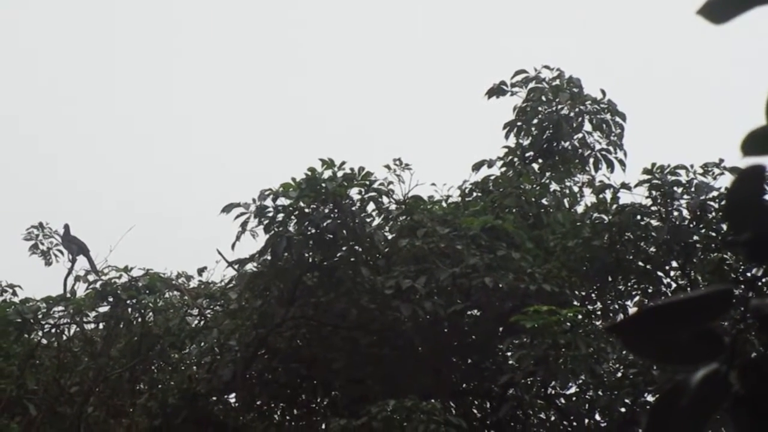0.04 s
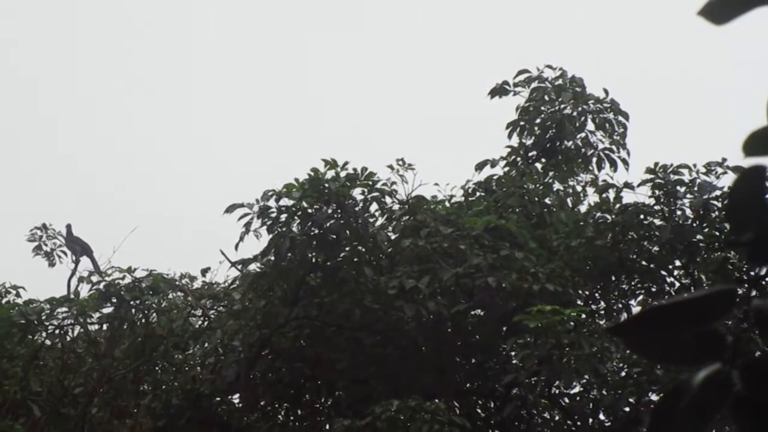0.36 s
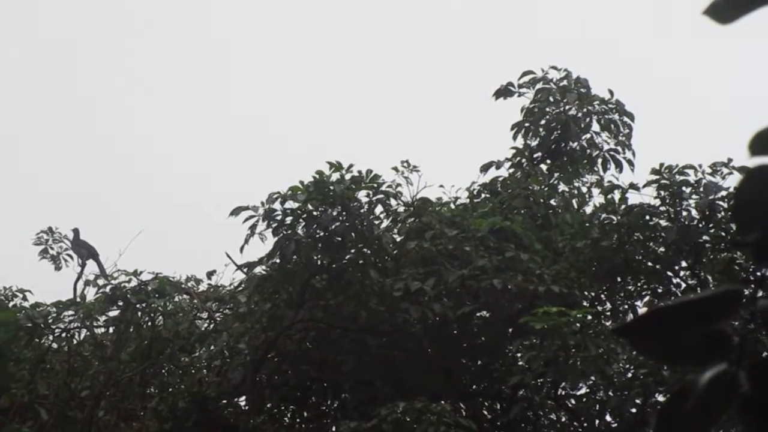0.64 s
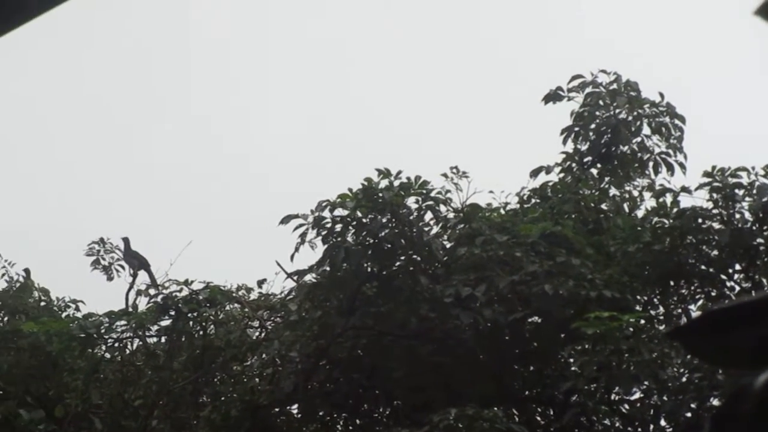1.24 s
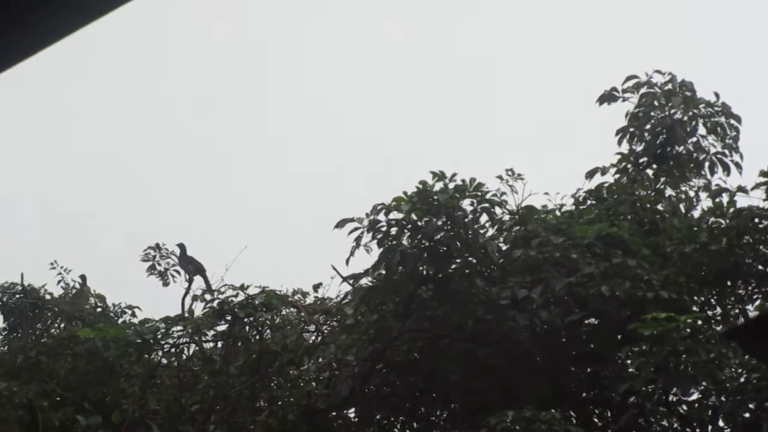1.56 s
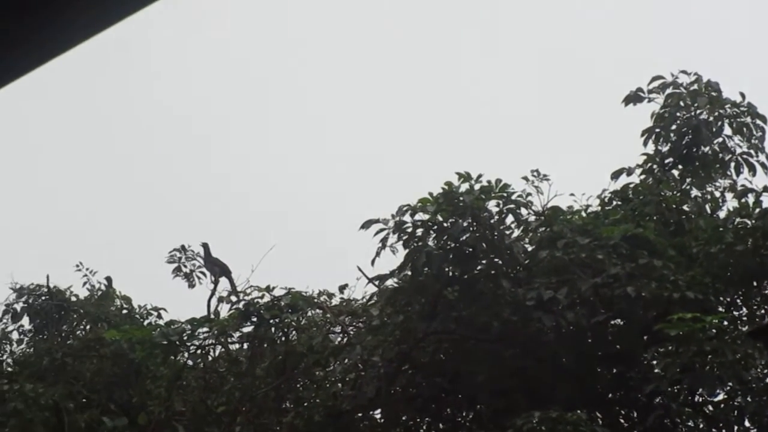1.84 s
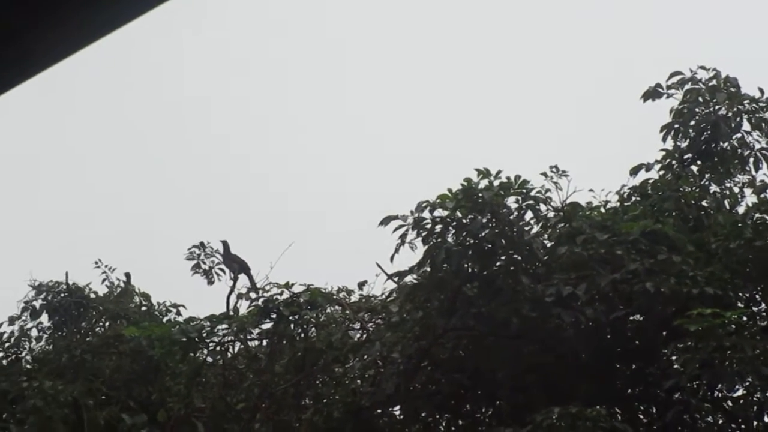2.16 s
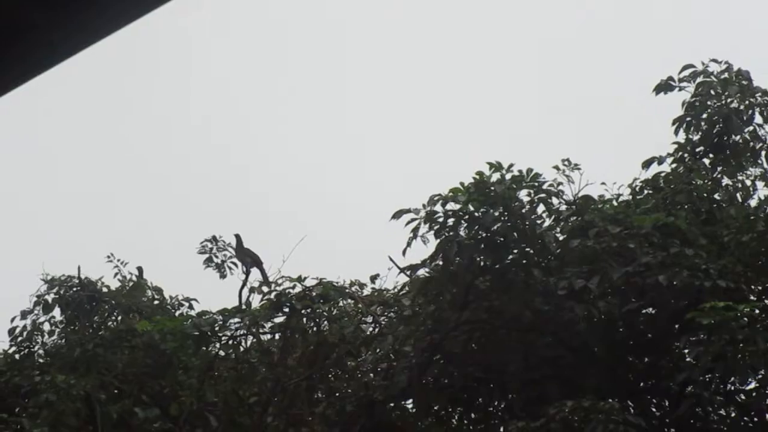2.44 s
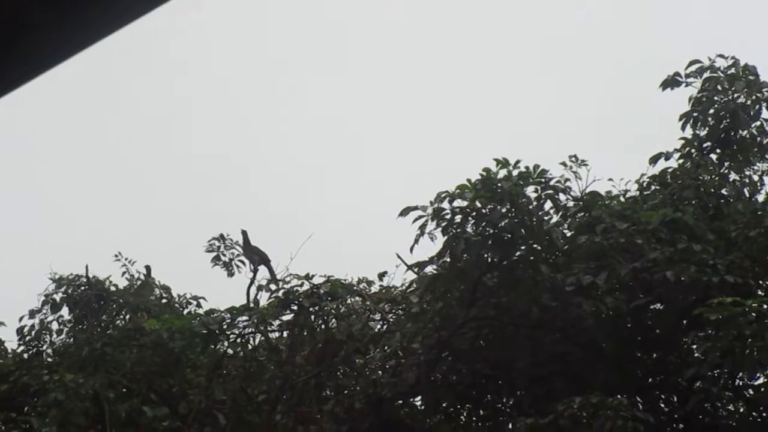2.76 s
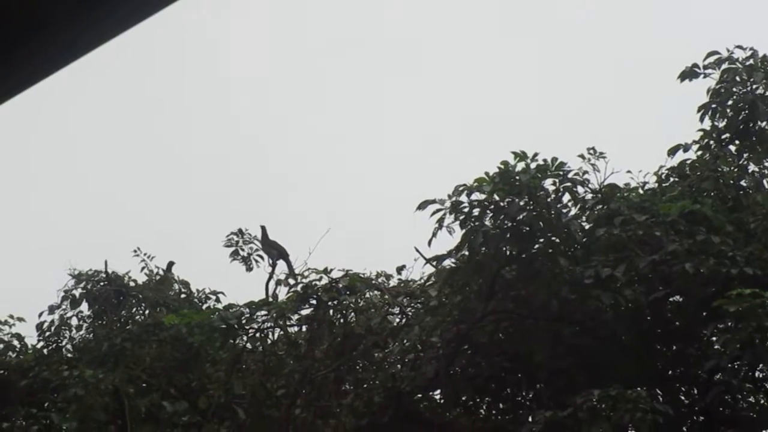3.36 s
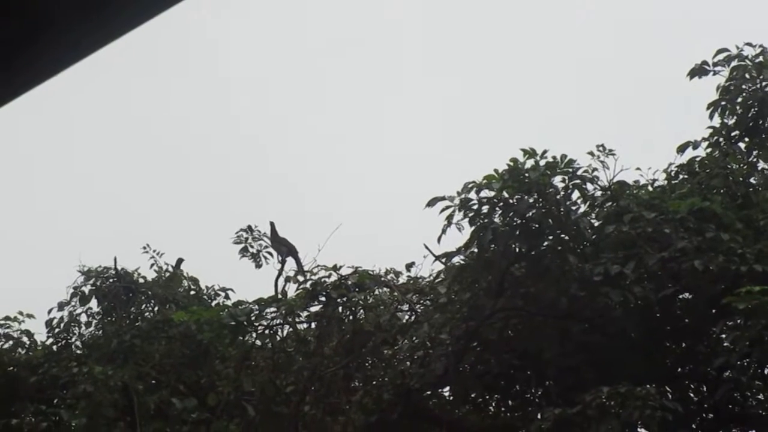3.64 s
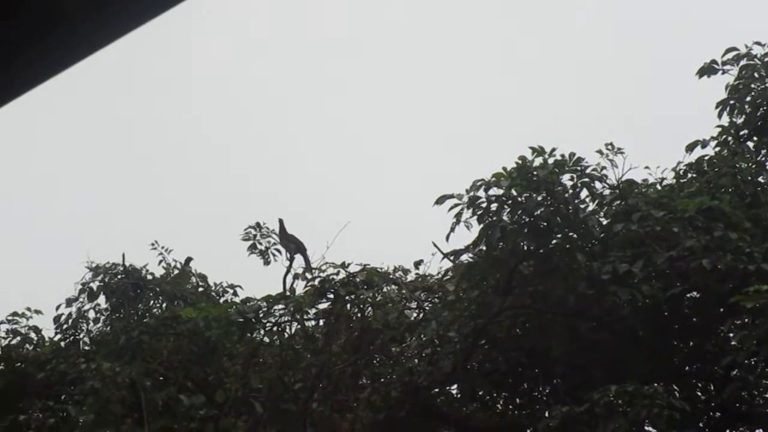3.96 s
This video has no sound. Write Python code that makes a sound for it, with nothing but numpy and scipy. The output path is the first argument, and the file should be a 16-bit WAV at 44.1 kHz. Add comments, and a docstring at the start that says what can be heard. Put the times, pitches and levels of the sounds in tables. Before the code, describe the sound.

Several large birds call loudly over one another from treetops around a yard. Each short call climbs through clear notes and drops into a harsh rasp, echoing briefly off trees and walls above a faint low rumble.

```python
"""Chachalacas round a yard

Four chachalacas call over one another from the treetops. Each call climbs through clear notes,
jumping register at each, then plunges into a harsh rasp of slapping membranes and puffs of air.
Trees and walls throw the calls back over a faint low rumble; near the end a far bird answers."""
import sys
import numpy as np
from scipy import signal
from scipy.fft import rfft, irfft
from scipy.io import wavfile
from scipy.ndimage import uniform_filter1d

SR = 44100
rng = np.random.default_rng(int(sys.argv[2]) if len(sys.argv) > 2 else 0)


def wrap_up_sound(samples):
    """Save the sound to the file named by the first command line argument, as 16-bit audio."""
    columns = np.atleast_2d(samples).T
    # keep every value between -1 and 1, then stretch to whole-number steps
    tamed = np.clip(columns, -1, 1)
    steps = np.round(tamed * 32767).astype(np.int16)
    wavfile.write(sys.argv[1], SR, steps)


N = 176400


def amp(db):
    """Decibels to gain."""
    return 10 ** (np.asarray(db) / 20)


def unit(x):
    """Normalises to rms 1."""
    return x / np.sqrt(np.mean(x ** 2) + 1e-20)


def curve_at(curve, hz):
    """Reads a curve on a log-frequency axis."""
    f, value = np.transpose(curve)
    return np.interp(np.log(hz + 1), np.log(f + 1), value)


def add(mix, start_s, sound):
    """Drops a sound into the mix at its cue."""
    part = mix[max(round(start_s * SR), 0):][:len(sound)]
    part += sound[:len(part)]


def smooth(x, s):
    """Running mean over s seconds."""
    return uniform_filter1d(x, max(int(s * SR), 1))


def wander(n, s):
    """Random modulator that changes every s seconds."""
    return unit(smooth(rng.standard_normal(n), s))


def equalise(x, curve, size=2048):
    """Minimum-phase EQ along a dB curve."""
    log_gain = np.log(amp(curve_at(curve, abs(np.fft.fftfreq(size, 1 / SR)))))
    taps = np.fft.ifft(np.exp(np.conj(signal.hilbert(log_gain)))).real
    return signal.fftconvolve(x, taps[:size // 2])[:len(x)]


# Tone of the outdoor bed: f/Hz, relative level/dB
RUMBLE_EQ = [(20, -16), (45, -3.5), (95, -1.5), (120, 2.5), (145, -1.5), (420, -6.5), (800, -4), (3000, -9),
             (7000, -22), (15000, -34)]


def outdoor_rumble(level_db=-41):
    """A steady bed of low rumble and faint hiss."""
    gain = amp(curve_at(RUMBLE_EQ, np.fft.rfftfreq(N, 1 / SR)))
    return amp(level_db) * unit(irfft(rfft(rng.standard_normal(N)) * gain, N))


# Reverb time of the yard: f/Hz, t60/s
YARD_DECAY = [(300, 0.2), (1200, 0.6), (3000, 0.62), (6000, 0.69), (14000, 0.65)]


def yard_reverb(x, predelay_s=0.0031, early_db=6.5, early_s=0.024, echoes_per_s=3000):
    """Early scatter from nearby leaves, then a tail from trees and walls."""
    t = np.arange(SR // 2) / SR
    echoes = rng.choice([-1., 1.], len(t)) * (rng.random(len(t)) < echoes_per_s / SR)
    echoes *= (t > predelay_s) * (1 + amp(early_db) * np.exp(-t / early_s))
    hz, age, bands = signal.stft(echoes, SR, nperseg=256)
    decay = amp(-60 * age / curve_at(YARD_DECAY, hz)[:, None])
    tail = signal.istft(bands * decay, SR, nperseg=256)[1]
    return signal.fftconvolve(x, tail / np.sqrt(np.sum(tail ** 2)))


# Contour of the answering cry, ahead of the reverb: t/s, f/Hz, level/dB
ANSWER_CONTOUR = [(3.82, 2900, -56), (3.89, 2717, -35), (3.951, 2446, -37), (4.0, 2360, -57)]


def distant_birds(flutter=0.097, chip_at_s=3.85, chip_s=0.018, chip_db=-43):
    """A falling, fluttering cry, fully wet, and one thin falling chip, dry."""
    out = np.zeros(N)
    times, hz, db = np.transpose(ANSWER_CONTOUR)
    t = np.arange(times[0], times[-1], 1 / SR)
    cry_hz = np.interp(t, times, hz) * (1 + flutter * wander(len(t), s=0.005))
    cry = amp(np.interp(t, times, db)) * np.sin(2 * np.pi * np.cumsum(cry_hz) / SR)
    add(out, times[0], yard_reverb(cry))
    chip_hz = np.linspace(9200, 8500, int(chip_s * SR))
    chip = np.hanning(len(chip_hz)) * np.sin(2 * np.pi * np.cumsum(chip_hz) / SR)
    add(out, chip_at_s, amp(chip_db) * chip)
    return out


# Tone of the rasp's grit: f/Hz, relative level/dB
RASP_EQ = [(200, -38), (400, -30.5), (560, -3), (800, 1.5), (1080, 7), (1800, -6), (2850, 0.5), (5000, -7),
           (6800, -12), (9000, -24.5), (15000, -40)]
RASP_HZ = 1168  # the notes plunge to this pitch and the rasp sags from it


def rasp(attack_s=0.0016, hold_s=0.016, release_s=0.008, sag=0.13, jitter=0.11, spread_db=7.5):
    """The closing squawk: uneven, slowing membrane slaps and puffs of air, with a tone fading in."""
    t = np.arange(0, hold_s + 6 * release_s, 1 / SR)
    n = len(t)
    progress = np.minimum(t / hold_s, 1)
    hz = RASP_HZ * (1 - sag * progress) * (1 + jitter * wander(n, s=1 / RASP_HZ))
    cycles = np.cumsum(hz) / SR
    slaps = np.diff(np.floor(cycles), prepend=0) * amp(spread_db * (2 * rng.random(n) - 1))
    puffs = (1 - cycles % 1) * rng.standard_normal(n)
    grit = unit(equalise(unit(slaps) + 0.53 * unit(puffs), RASP_EQ))
    tone = 1.2 * progress * np.sin(2 * np.pi * cycles)
    envelope = np.minimum(t / attack_s, 1) * np.exp(-np.maximum(t - hold_s, 0) / release_s)
    return unit(grit + tone) * envelope


# Throat colour on the overtones, and tone of the breath: f/Hz, relative level/dB
THROAT_EQ = [(500, -6), (1500, 16), (3200, 0), (4800, -5), (5900, -8), (7800, -21), (9700, -27),
             (12000, -40), (15000, -54)]
BREATH_EQ = [(200, -51), (700, -17), (2800, -1), (5200, 10.5), (7000, -0.5), (9000, -20), (15000, -46)]


def climb(notes, times, detune_percent, tilt_db_per_octave, tilt_from_hz=5460,
          jump_s=0.0021, flick_s=0.0029, plunge_s=0.00697, swell_db=1.5, even_db=-3, breath_db=-3.5):
    """The clear part of a call: notes jump upward in register, then darken and swell as they plunge."""
    lengths = np.maximum(np.diff(times) * SR, 2).astype(int)
    ramps = [np.linspace((f0, db0, bright0, rough), (f1, db1, bright1, rough), length)
             for (f0, f1, db0, db1, bright0, bright1, rough), length in zip(notes, lengths)]
    hz, db, bright_db, rough = np.concatenate(ramps).T
    n = len(hz)
    t = np.arange(n) / SR
    to_end = t[-1] - t
    held = np.minimum(to_end / plunge_s, 1)  # falls from 1 to 0 in the plunge

    to_jump = np.concatenate([np.arange(length)[::-1] / SR for length in lengths])
    flick = 1 + 0.025 * np.exp(-to_jump / flick_s)  # pitch lifts just before each jump
    hz = smooth(hz * flick, jump_s) * (1 + detune_percent / 100)
    waver = 0.0035 * wander(n, s=0.005)
    hoarseness = 0.079 * wander(n, s=0.00064) + 0.045 * wander(n, s=0.003)
    hz = (RASP_HZ + (hz - RASP_HZ) * held) * (1 + waver + rough * held * hoarseness)

    phase = 2 * np.pi * np.cumsum(hz) / SR
    brightness = amp(smooth(bright_db, jump_s)) * held
    voice = np.cos(phase)
    for k in range(2, 11):
        tilt_db = tilt_db_per_octave * np.log2(np.maximum(k * hz / tilt_from_hz, 1))
        gain = amp(curve_at(THROAT_EQ, k * hz) + even_db * (k % 2 == 0) + tilt_db)
        voice += brightness * gain * (k * hz < SR / 2) * np.cos(k * phase + 2 * np.pi * rng.random())
    voice *= 1 + 0.81 * rough * wander(n, s=0.002)  # shimmer on the rough notes
    breath = (1 + np.cos(phase)) * rng.standard_normal(n)
    voice += amp(breath_db) * rough * unit(equalise(breath, BREATH_EQ))
    level = amp(smooth(db + swell_db * (held < 1), jump_s))
    fades = np.clip(np.minimum(t, to_end) / jump_s * 2, 0, 1)
    return voice * level * fades


def chachalaca(notes, cues, delivery, wet_db, tilt_db_per_octave, slapback_s=0.075, slapback_db=-17.5):
    """One bird on its perch; it turns as it calls, so each call has its own reverb."""
    out = np.zeros(N)
    for times, (climb_db, rasp_db, detune_percent) in zip(cues, delivery):
        call = np.zeros(SR // 2)
        add(call, 0, amp(climb_db) * climb(notes, times, detune_percent, tilt_db_per_octave))
        add(call, times[-1] - times[0], amp(rasp_db) * rasp())
        add(out, times[0], call)
        add(out, times[0], amp(wet_db) * yard_reverb(call))
        add(out, times[0] + slapback_s, amp(wet_db + slapback_db) * call)  # one distinct wall echo
    return out


# Each bird's phrase, a row per note: start f/Hz, end f/Hz, start level/dB, end level/dB,
# start overtone gain/dB, end overtone gain/dB, roughness/0-1
NEAR_NOTES = [(1233.6, 1310, -30.5, -24, -27, -1, 0), (1604, 1555, -17.5, -16.5, -11.5, -5.5, 0.05),
              (1850, 1950, -36, -20.5, 6, 8, 0), (2148, 3200, -26.5, -23, 6, 8, 0.55)]
SHRILL_NOTES = [(1058, 1110, -30, -32, 1, -20, 0.39), (1339, 1430, -28, -20, -7.5, -10.5, 0.14),
                (1598, 1690, -18.5, -26, -18.5, 8, 0.074), (2248, 2290, -23, -19, -10, 8.5, 0.17),
                (2999, 2800, -21, -20, -2, -5, 0.3)]
DEEP_NOTES = [(1223, 1340, -23.5, -19.5, -24, -11.5, 0.059), (1458, 1510, -16.5, -22.5, -14.5, -7, 0.048),
              (1534, 1600, -27, -34.5, 2.5, 19.5, 0.095), (1997, 2100, -20, -31.5, -9.5, 16.5, 0.16)]
FAR_NOTES = [(1290, 1450, -37.5, -27.5, -1, -10, 0.21), (1599, 1650, -28.5, -28.5, -10, 3, 0.17),
             (2028, 2090, -31, -34, 0, 4.5, 0.14)]
# Cues, a row per call: onset t/s of each note, then onset t/s of the rasp
NEAR_CUES = [(.358, .378, .412, .492, .512), (1.147, 1.165, 1.202, 1.273, 1.292),
             (1.864, 1.887, 1.932, 2.008, 2.024), (2.836, 2.858, 2.892, 2.946, 2.966),
             (3.565, 3.585, 3.630, 3.709, 3.730)]
SHRILL_CUES = [(.147, .165, .21, .287, .306, .327), (.76, .775, .83, .905, .922, .944),
               (1.518, 1.533, 1.58, 1.644, 1.662, 1.682), (2.235, 2.255, 2.305, 2.368, 2.383, 2.404),
               (2.87, 2.888, 2.94, 3.006, 3.023, 3.043), (3.61, 3.63, 3.672, 3.728, 3.748, 3.769)]
DEEP_CUES = [(.962, .995, 1.055, 1.093, 1.128), (2.122, 2.150, 2.215, 2.253, 2.287),
             (3.062, 3.095, 3.168, 3.200, 3.236)]
FAR_CUES = [(.006, .028, .095, .16), (.683, .72, .77, .85), (1.508, 1.53, 1.59, 1.65),
            (2.45, 2.48, 2.54, 2.595), (3.395, 3.425, 3.485, 3.555)]
# Delivery, a row per call: trim on the notes/dB, rasp level/dB, detune/%
NEAR_DELIVERY = [(-4, -22.5, -0.035), (-2, -23.5, -0.009), (-0.5, -21, -0.015), (0, -25, -0.314),
                 (0.5, -21, -0.065)]
SHRILL_DELIVERY = [(-0.33, -20, 0.5), (-0.29, -20.5, 0.5), (-0.14, -20, -0.5), (-0.38, -20, .5),
                   (-0.61, -19, 2), (-0.042, -20.5, .5)]
DEEP_DELIVERY = [(-2, -22, 0.74), (-1.7, -22, 0.045), (-0.81, -22.5, -0.982)]
FAR_DELIVERY = [(-0.75, -43, -0.58), (1.4, -43, 0.99), (0.15, -40.5, 0.049), (0.72, -39, -0.0078),
                (-1.7, -44, -0.72)]


def chorus():
    """Four chachalacas overlap, the far one wettest."""
    near = chachalaca(NEAR_NOTES, NEAR_CUES, NEAR_DELIVERY, wet_db=-3.5, tilt_db_per_octave=-2)
    shrill = chachalaca(SHRILL_NOTES, SHRILL_CUES, SHRILL_DELIVERY, wet_db=-3, tilt_db_per_octave=-10)
    deep = chachalaca(DEEP_NOTES, DEEP_CUES, DEEP_DELIVERY, wet_db=-4.5, tilt_db_per_octave=5)
    far = chachalaca(FAR_NOTES, FAR_CUES, FAR_DELIVERY, wet_db=3.5, tilt_db_per_octave=6)
    return near + shrill + deep + far


def scene():
    """Mono mix: the chorus in front, distant birds and the rumble behind."""
    return (chorus() + distant_birds() + outdoor_rumble())[None]


def record(dry):
    """A steep high cut on the master."""
    cutoff_hz = 15050
    high_cut = signal.firwin(511, cutoff_hz, window=("kaiser", 9), fs=SR)
    return signal.oaconvolve(dry, high_cut[None], "same")


dry = scene()
out = record(dry)
wrap_up_sound(out)
```